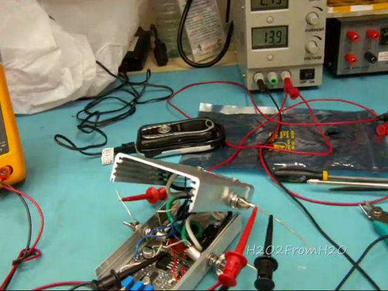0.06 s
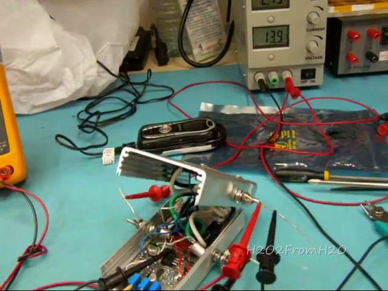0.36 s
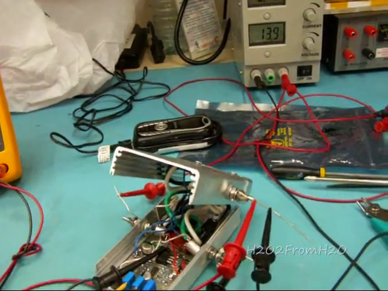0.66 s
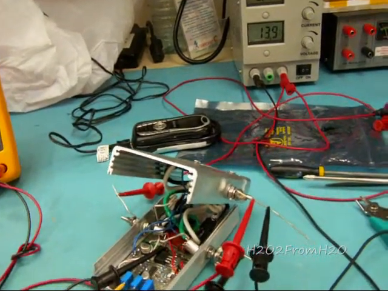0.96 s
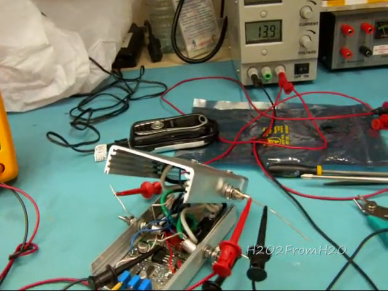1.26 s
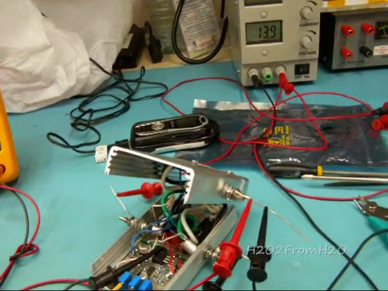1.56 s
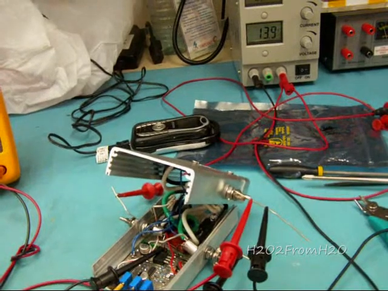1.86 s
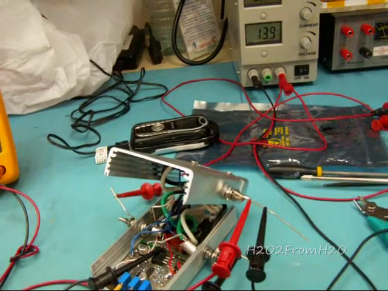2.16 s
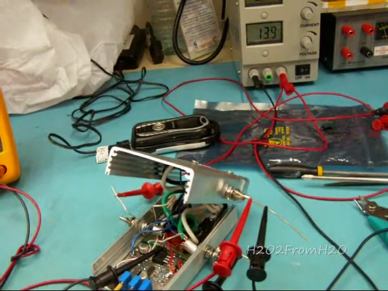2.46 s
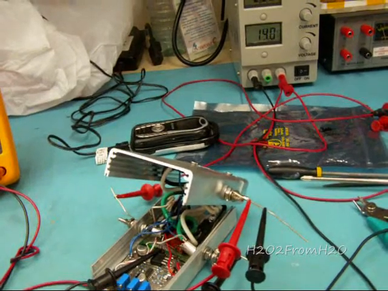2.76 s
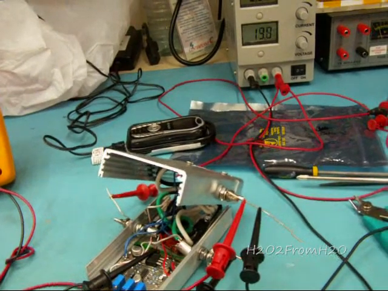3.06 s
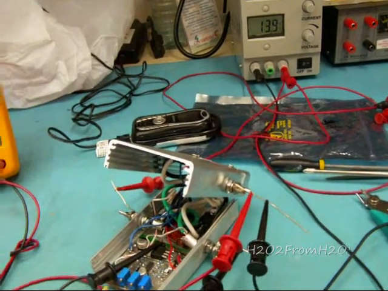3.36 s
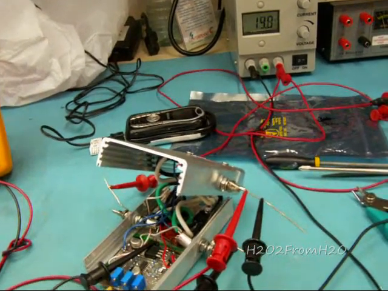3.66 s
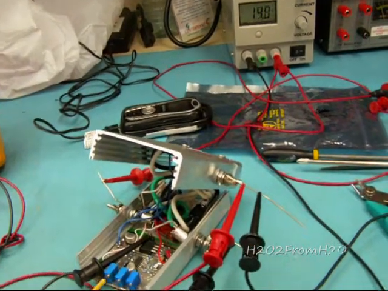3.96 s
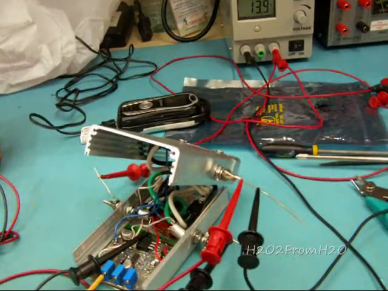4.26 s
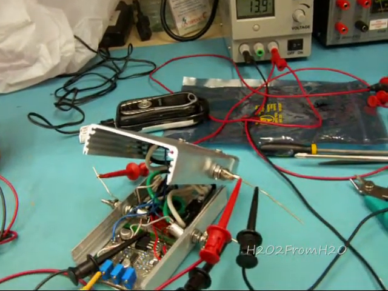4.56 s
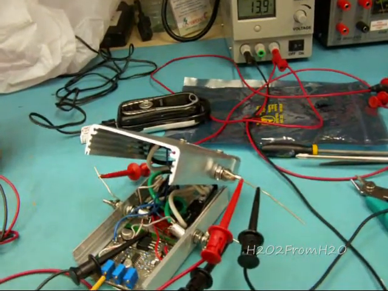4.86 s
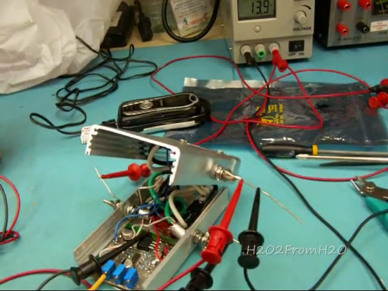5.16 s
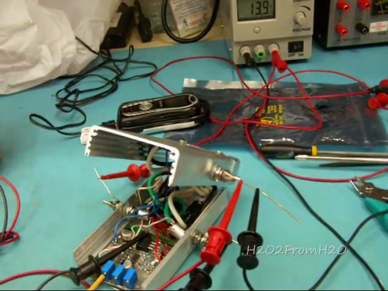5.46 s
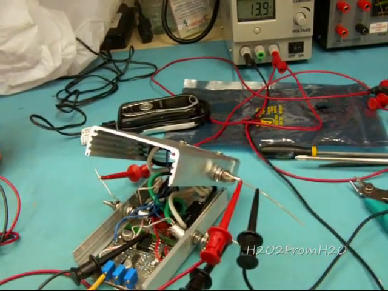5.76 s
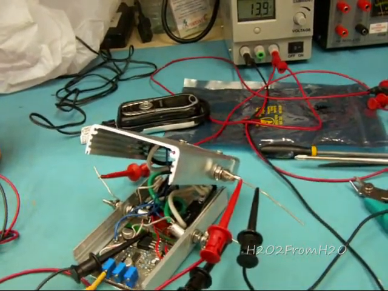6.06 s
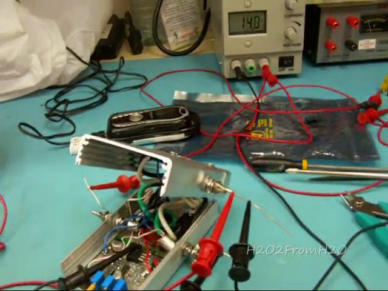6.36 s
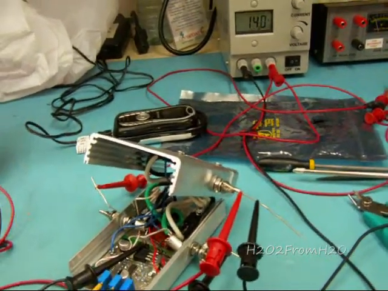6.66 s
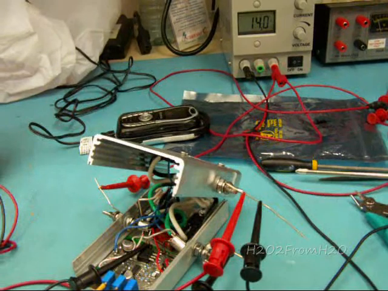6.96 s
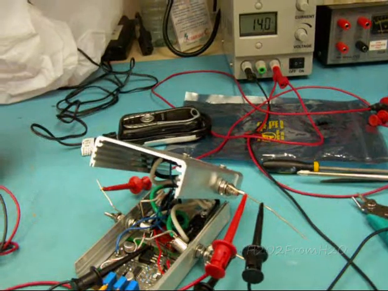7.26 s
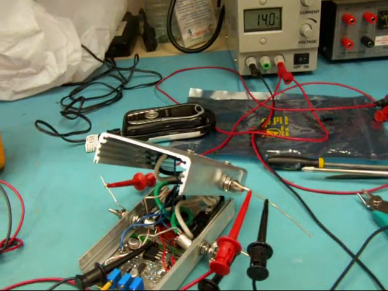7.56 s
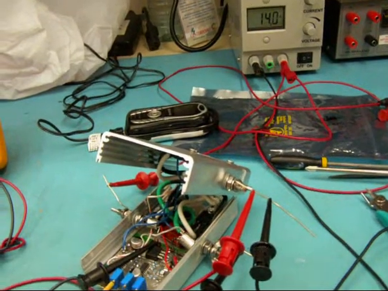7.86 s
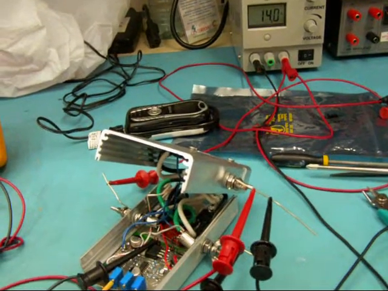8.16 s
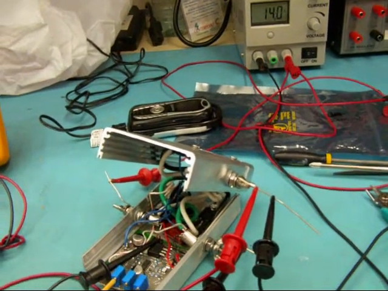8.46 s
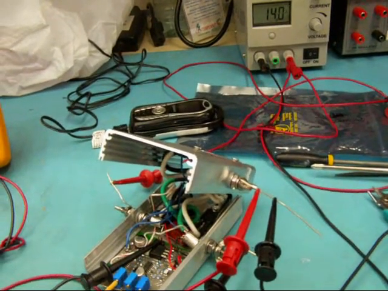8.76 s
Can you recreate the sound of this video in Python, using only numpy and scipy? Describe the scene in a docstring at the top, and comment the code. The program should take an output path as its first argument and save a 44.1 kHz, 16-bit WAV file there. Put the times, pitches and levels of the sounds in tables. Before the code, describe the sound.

Steady buzzing drone of a little electric pump, with valve rattle, hiss and a thin electronic whine, labouring a little toward the end.

```python
"""On a workbench, close to a mono microphone, a small diaphragm vacuum pump runs and slows in two steps.
Its strokes drum through housing and bench, its valves rattle, air rushes in the chamber and hisses out.
As it slows it labours and the linkage knocks. The controller's switched current makes the motor
windings whine and buzz. Twice something clicks sharply; a faint low hum swells once."""
import sys
import numpy as np
from scipy import signal
from scipy.fft import rfft, irfft, next_fast_len
from scipy.io import wavfile
from scipy.ndimage import uniform_filter1d, minimum_filter1d

SR = 44100
rng = np.random.default_rng(int(sys.argv[2]) if len(sys.argv) > 2 else 0)


def persist_wave(psi):
    """Save psi, clipped to +-1, as 16-bit WAV."""
    counts = np.round(np.clip(psi, -1, 1) * 32767).astype(np.int16)
    wavfile.write(sys.argv[1], SR, np.atleast_2d(counts).T)


N = 397385
T = np.arange(N) / SR
CONTROL_STEP_SAMPLES = 40
CONTROL_T = np.arange(N // CONTROL_STEP_SAMPLES + 2) * CONTROL_STEP_SAMPLES / SR

# motor shaft speed: time_s, speed_hz
SHAFT_SPEED = [(0.0, 44.8), (1.25, 44.7), (1.38, 44.3), (1.83, 43.9), (2.41, 42.4), (2.53, 42.2),
               (5.82, 42.1), (6.3, 42.3), (6.5, 41.6), (6.83, 40.7), (6.97, 40.7), (7.33, 40.2),
               (7.45, 39.6), (8.35, 38.5), (8.88, 38.0), (9.01, 37.9)]
# stroke force: shaft_harmonic, level_db
STROKE_HARMONICS = [(1, -47), (2, -53.5), (3, -49), (4, -42), (5, -58.5), (6, -40), (7, -49.5), (8, -49.5),
                    (9, -46.5), (10, -52.5), (11, -51.5), (12, -50), (13, -55), (14, -52.5), (15, -54),
                    (16, -52), (17, -60.5), (18, -53), (19, -56), (20, -47.5), (21, -56), (22, -45.5),
                    (23, -45.5), (24, -55), (25, -43), (26, -44), (27, -56.5), (28, -48.5), (29, -48.5),
                    (30, -51.5), (31, -48), (32, -45.5), (33, -48.5), (34, -54), (35, -44), (36, -54.5),
                    (37, -43.5), (38, -56.5), (39, -48), (40, -53.5), (41, -52.5), (42, -63), (43, -50),
                    (44, -53), (45, -47.5), (46, -52), (47, -58), (48, -47), (49, -55), (50, -46),
                    (51, -51), (52, -51)]
# housing and bench resonances: centre_hz, width_hz, gain_db
BODY_MODES = [(78.7, 5.5, 19.5), (124.2, 5.6, 4.5), (153.4, 3.2, 6), (261.2, 17, 4.5), (312.8, 11, 12.5),
              (352.8, 8.9, 6), (392, 25.4, 15.5), (449, 11.3, 16.5), (510, 47, 9), (586.2, 8, 8),
              (654, 5, 4), (797.6, 14, 6.5), (864, 99, 8.5), (895, 5.8, 4), (971, 8.3, 6), (1206, 46, 7),
              (1302, 59, 15), (1392, 6, 8), (1685, 5.5, 11), (1732, 18.4, 17.5), (1790, 11, 14.5),
              (1895, 6, 6.5), (1927, 70, 4), (2005, 82, 15.5)]
# bench reflections, cancelling or reinforcing: centre_hz, width_hz, gain_db
BENCH_REFLECTIONS = [(90.3, 7, -11.5), (167.5, 6, -3), (215, 25, -7.5), (760, 66, -3), (958, 54, -3),
                     (1014, 20, 4), (1834, 20, -6), (1122, 50, -8), (1650, 50, -7)]
# valve plate resonances: centre_hz, width_hz, gain_db
VALVE_MODES = [(1758, 69, -7), (1917, 40, -6), (1958, 35, -1), (2013, 39, 1), (2114, 150, -11.5),
               (2555, 130, -7), (3350, 83, -6), (4980, 84, -2)]
# exhaust noise: frequency_hz, relative_density_db
EXHAUST_SPECTRUM = [(1350, -36.5), (2300, -4), (2610, -1.5), (3090, -7), (3410, -7.5), (3930, -4.5),
                    (4010, -5.5), (4290, -4.5), (4360, -3.5), (5080, -4), (6430, -12.5), (7570, -22.5),
                    (8060, -40), (10500, -70), (17700, -120)]
# peaks and dips that nearby reflections give the hiss: centre_hz, width_hz, gain_db
HISS_RIPPLE = [(2366, 70, -3.5), (2440, 55, 1), (2717, 57, -6), (2770, 44, 4), (2860, 77, -5),
               (2985, 50, 2.5), (3164, 85, -6), (3346, 120, 5), (3700, 110, 1), (3900, 140, -2.5),
               (4750, 71, -1), (4800, 140, 0.5), (5610, 54, -6), (5670, 73, 4.5), (5900, 110, -2.5),
               (6530, 300, 2), (6750, 130, -5.5), (7870, 94, 8.5)]
# air noise in the pump chamber: frequency_hz, relative_density_db
CHAMBER_SPECTRUM = [(17, -11.5), (45, -6), (105, -12.5), (200, -8.5), (310, -4.5), (400, 0.5), (560, -11.5),
                    (720, -14.5), (1000, 1), (1150, -3.5), (1370, 1.5), (1530, -9.5), (1800, -4.5),
                    (2400, -26.5)]
# winding buzz: switching_harmonic, sideband_shaft_orders (rounded in use), relative_db
BUZZ_LINES = [(1, -3.5, -3.5), (1, -0.5, 0), (1, -0.5, -12), (1, 1, -4), (2, 0, -7.5), (3, -1, -8.5),
              (3, 3, -12), (4, -1, -11.5), (5, -1, -17)]
# sharp clicks: start_s, ring_gain_db, ring_hz, ring_t60_s, snap_gain_db, snap_hz, snap_width_hz
CLICK_EVENTS = [(2.8998, 9.5, 3700, 0.019, -3, 6840, 1500), (2.9129, -5, 3430, .01, -10, 6850, 1500),
                (2.9204, -5, 3830, .015, -23, 7440, 1500), (3.1680, -2.5, 3680, .008, -1, 4930, 2800)]

CRUISE_HZ, LABOUR_ONSET_HZ, LABOUR_RANGE_HZ = 42.2, 41.9, 1.5   # shaft speeds
STROKE_GAP_TURNS = 0.56   # exhaust to intake
KNOCK_HZ = 1320


def drumming(turns, intake=0.89, scatter_rad=0.81, dispersion=0.6, flutter=0.19):
    """Stroke harmonics swell and fade as the speed carries them across the body's resonances."""
    speed_hz = shaft_speed_hz(CONTROL_T)
    load = labour(speed_hz)
    # under load the midrange softens and gives way around the knock
    load_bands = [(780, 300, np.interp(load, [0, 1], [1.5, -2.5])), (KNOCK_HZ, 200, -6 * load)]
    out = np.zeros(N)
    for k, (_, level_db) in enumerate(STROKE_HARMONICS, 1):
        height = k / len(STROKE_HARMONICS)
        pair_rad = np.angle(1 + intake * np.exp(-2j * np.pi * k * STROKE_GAP_TURNS))
        smear_rad = scatter_rad * height * rng.standard_normal()   # reflections smear the highs
        bending_rad = np.pi * dispersion * k * height   # high bending waves outrun low ones
        phase = np.exp(1j * (pair_rad + smear_rad + bending_rad))
        unsteady = 1 + flutter * height * (drift(rate_hz=4) + 1j * drift(rate_hz=4))
        hz = k * speed_hz
        body = response(BODY_MODES, hz) * response(BENCH_REFLECTIONS, hz) * response(load_bands, hz)
        phasor = np.interp(T, CONTROL_T, from_db(level_db) * body * phase * unsteady)
        out += (phasor * np.exp(2j * np.pi * k * turns)).real
    return np.sqrt(2) * out


def valve_rattle(turns, uneven_db=0.8, chatter=0.48):
    """Each stroke slaps a valve with its own strength; the plate chatters in between."""
    stroke = (np.floor(turns) + np.floor(turns - STROKE_GAP_TURNS) + 1).astype(int)
    strength = from_db(uneven_db * rng.standard_normal(stroke[-1] + 1))[stroke]
    strength *= limp(stroke // 2, depth_db=4.5, slip_chance=0.15)
    slaps = strength * stroke_pulses(turns, intake=0.85, decay_turns=0.13)
    force = (slaps + chatter) * rng.standard_normal(N)
    plate = sum(from_db(db) * resonate(force, hz, width_hz) for hz, width_hz, db in VALVE_MODES)
    return unit_rms(resonate(plate, hz=2043, width_hz=670))


def airflow(turns, pulsing, spectrum, ripple=()):
    """Turbulence surges with each stroke."""
    flow = 1 + pulsing * stroke_pulses(turns, intake=1.0, decay_turns=0.12)
    return shape_spectrum(flow * rng.standard_normal(N), spectrum, ripple)


def linkage_knock(turns, offset_turns=0.52, width_hz=140):
    """The loaded linkage knocks once a turn, harder on every other."""
    turn = np.floor(turns + 1 - offset_turns).astype(int)
    hits = np.diff(turn, prepend=turn[0]) * limp(turn, depth_db=7.0, slip_chance=0.1)
    return unit_rms(resonate(resonate(hits, KNOCK_HZ, width_hz), KNOCK_HZ, 3 * width_hz))


def controller_whine(turns, load, buzz_db, peak_s=3.65, peak_db=-23.5, waver_db=0.77):
    """Switched current makes the windings sing; the turning shaft adds sidebands."""
    def tone(level_db, cycles):
        level_db = level_db + waver_db * np.interp(T, CONTROL_T, drift(rate_hz=13))
        return np.sqrt(2) * from_db(level_db) * np.sin(2 * np.pi * cycles)

    third_harmonic_hz = np.interp(load, [0, 1], [4143.8, 4147.5])
    switch_cycles = np.cumsum(third_harmonic_hz / 3) / SR
    swell_db_per_s, fade_db_per_s = 2.5, 1.14
    whine_db = peak_db - np.maximum(swell_db_per_s * (peak_s - T), fade_db_per_s * (T - peak_s))
    out = tone(whine_db, 3 * switch_cycles)
    for harmonic, sideband, relative_db in BUZZ_LINES:
        out += tone(buzz_db + relative_db, round(harmonic) * switch_cycles + round(sideband) * turns)
    return out


def clicks(snap_decay_s=0.0014):
    """Each click is a short ring under a bright noise snap."""
    out = np.zeros(N)
    age_s = np.arange(SR // 10) / SR
    for start_s, ring_db, ring_hz, t60_s, snap_db, snap_hz, snap_width_hz in CLICK_EVENTS:
        ring = np.sin(2 * np.pi * ring_hz * age_s) * from_db(-60 * age_s / t60_s)
        ring = resonate(ring, ring_hz, width_hz=1550)
        burst = rng.standard_normal(len(age_s)) * np.exp(-age_s / snap_decay_s)
        snap = resonate(resonate(burst, snap_hz, snap_width_hz), snap_hz, snap_width_hz)
        snap /= np.abs(snap).max()
        start = round(start_s * SR)
        out[start:start + len(age_s)] += from_db(ring_db) * ring + from_db(snap_db) * snap
    return signal.sosfilt(signal.butter(8, 7750, fs=SR, output="sos"), out)


def hum(pitch_hz=60, rest_db=-60.5, swell_db=16, peak_s=4.1, half_width_s=0.55):
    """A faint low tone with one swell."""
    swell = np.exp(-((T - peak_s) / half_width_s) ** 2)
    return from_db(rest_db + swell_db * swell) * unit_rms(np.sin(2 * np.pi * pitch_hz * T))


def shaft_speed_hz(times_s):
    """Turns per second, linear between table points."""
    return np.interp(times_s, *np.transpose(SHAFT_SPEED))


def labour(speed_hz):
    """Pump load: 0 running freely, 1 labouring fully."""
    return np.clip((LABOUR_ONSET_HZ - speed_hz) / LABOUR_RANGE_HZ, 0, 1)


def stroke_pulses(turns, intake, decay_turns):
    """Two decaying puffs a turn, exhaust then intake; rms 1."""
    exhaust_puff = np.exp(-(turns % 1) / decay_turns)
    intake_puff = np.exp(-((turns - STROKE_GAP_TURNS) % 1) / decay_turns)
    return unit_rms(exhaust_puff + intake * intake_puff)


def limp(turn, depth_db, slip_chance):
    """Strong and weak turns alternate; now and then the pattern slips by one."""
    flips = rng.random(turn[-1] + 1) > slip_chance
    return from_db(depth_db * (np.cumsum(flips) % 2 - 0.5))[turn]


def drift(rate_hz):
    """Slow random wander at the control rate; rms 1."""
    pole = np.exp(-2 * np.pi * rate_hz * CONTROL_STEP_SAMPLES / SR)
    wander = signal.lfilter([1], [1, -2 * pole, pole ** 2], rng.standard_normal(2 * len(CONTROL_T)))
    return unit_rms(wander[len(CONTROL_T):])


def response(bands, hz):
    """Complex gain of peaks and dips in series."""
    stages = [1 + (from_db(db) - 1) / (1 + 2j * (hz - centre_hz) / width_hz)
              for centre_hz, width_hz, db in bands]
    return np.prod(stages, axis=0)


def shape_spectrum(x, spectrum, ripple):
    """Filter by a smooth spectrum with steep skirts, plus peaks and dips; rms 1."""
    size = next_fast_len(N)
    hz = np.maximum(np.arange(size // 2 + 1) * SR / size, 1)
    points_hz, points_db = np.transpose(spectrum)
    curve = from_db(np.interp(np.log(hz), np.log(points_hz), points_db))
    skirts = np.minimum(1, np.minimum(hz / points_hz[0], points_hz[-1] / hz)) ** 6
    return unit_rms(irfft(rfft(x, size) * curve * skirts * response(ripple, hz), size)[:N])


def resonate(x, hz, width_hz):
    """Two-pole band-pass, peak gain 1."""
    radius = np.exp(-np.pi * width_hz / SR)
    feedback = [1, -2 * radius * np.cos(2 * np.pi * hz / SR), radius ** 2]
    return signal.lfilter(np.array([1, 0, -1]) * (1 - radius ** 2) / 2, feedback, x + 1e-18)


def from_db(db):
    """Decibels to gain."""
    return 10 ** (np.asarray(db) / 20)


def unit_rms(x):
    """Scale to rms 1."""
    return x / np.sqrt(np.mean(np.abs(x) ** 2) + 1e-20)


def scene():
    """One shaft times strokes, valves, air and knock; its speed sets the load and most levels."""
    speed_hz = shaft_speed_hz(T)
    turns = np.cumsum(speed_hz) / SR
    over_cruise_hz = speed_hz - CRUISE_HZ
    load = labour(speed_hz)
    drum = from_db(0.12 + 0.3 * over_cruise_hz) * drumming(turns)
    valves = from_db(-22.5 - 0.55 * abs(over_cruise_hz)) * valve_rattle(turns)
    rush = from_db(-30) * airflow(turns, pulsing=0.36, spectrum=CHAMBER_SPECTRUM)
    hiss_db = -21.5 + 0.14 * over_cruise_hz
    hiss = from_db(hiss_db) * airflow(turns, pulsing=0.16, spectrum=EXHAUST_SPECTRUM, ripple=HISS_RIPPLE)
    knock = from_db(np.interp(load, [0, 1], [-36, -26.5])) * linkage_knock(turns)
    whine = controller_whine(turns, load, buzz_db=-37.5 - 0.9 * over_cruise_hz)
    mono = drum + valves + rush + hiss + knock + whine + clicks() + hum()
    return np.array([mono, mono])


def record(dry):
    """Look-ahead peak limiter, then a steep low-pass."""
    ceiling_db, release_db_per_s, window_samples, cutoff_hz = -0.25, 220, 48, 8250
    peak_db = 20 * np.log10(np.abs(dry).max(axis=0) + 1e-9)
    over_db = np.maximum(peak_db - ceiling_db, 0)
    release_db = release_db_per_s * T
    reduction_db = np.maximum.accumulate(over_db + release_db) - release_db
    gain_db = uniform_filter1d(minimum_filter1d(-reduction_db, window_samples), window_samples)
    lowpass = signal.ellip(12, 0.1, 80, cutoff_hz, fs=SR, output="sos")
    return signal.sosfilt(lowpass, dry * from_db(gain_db))


dry = scene()
out = record(dry)
persist_wave(out)
```